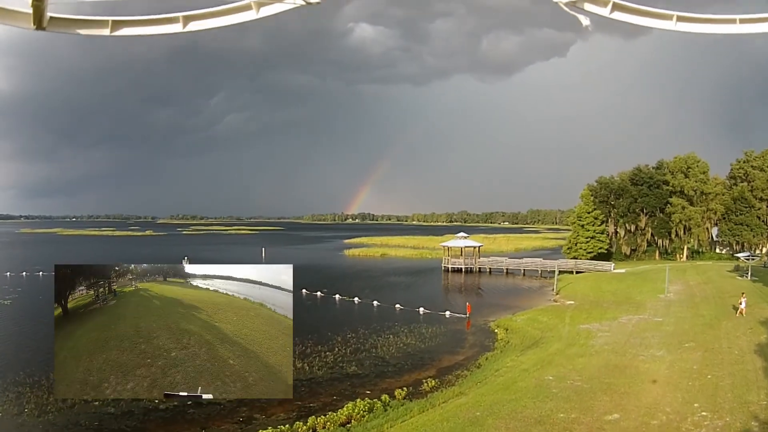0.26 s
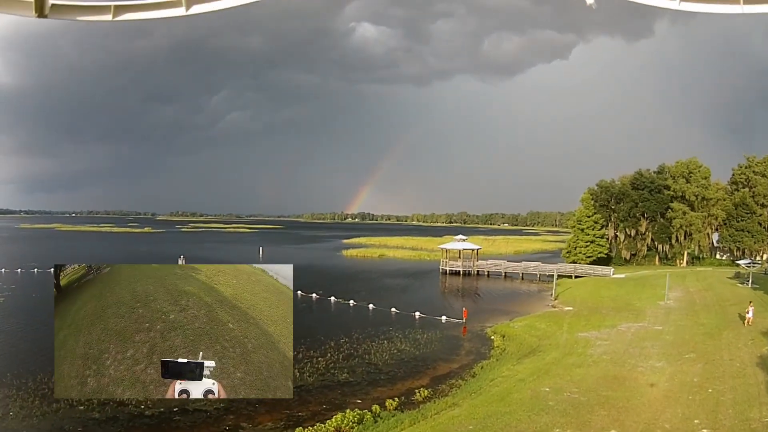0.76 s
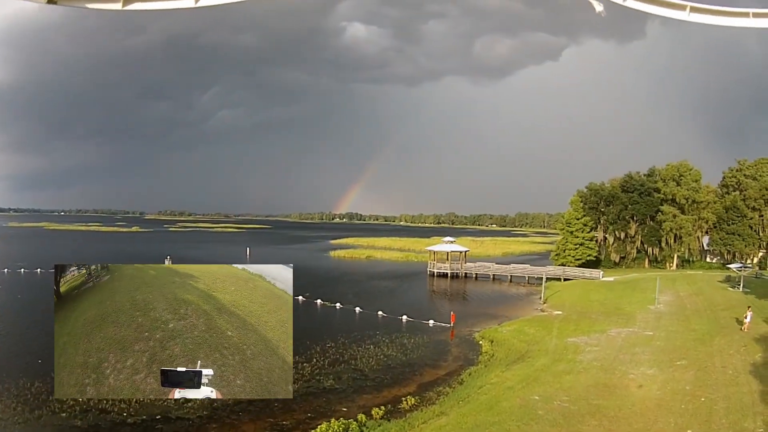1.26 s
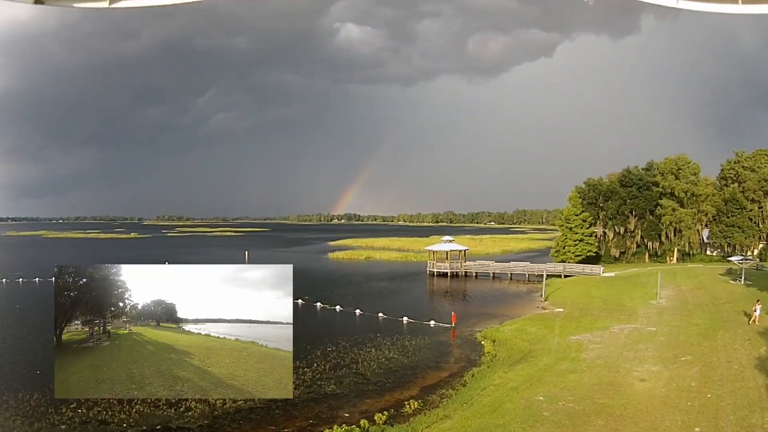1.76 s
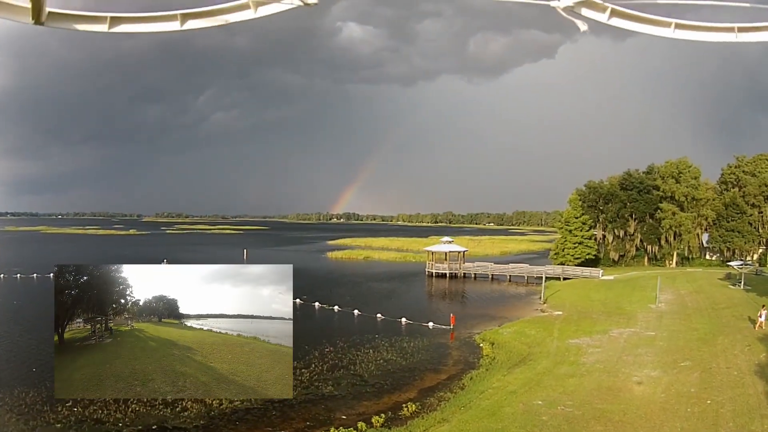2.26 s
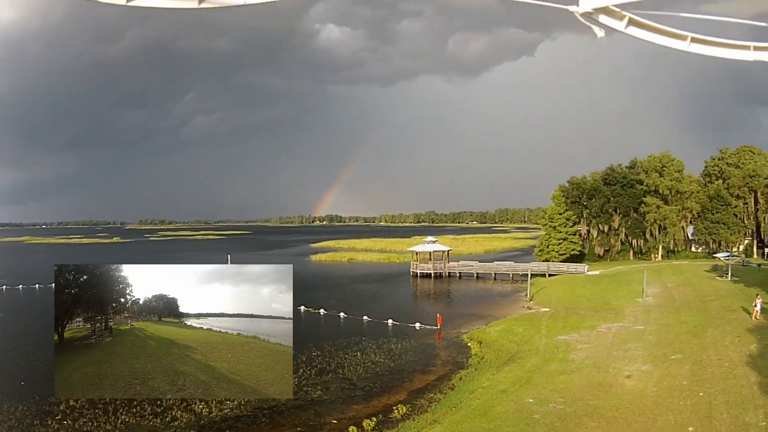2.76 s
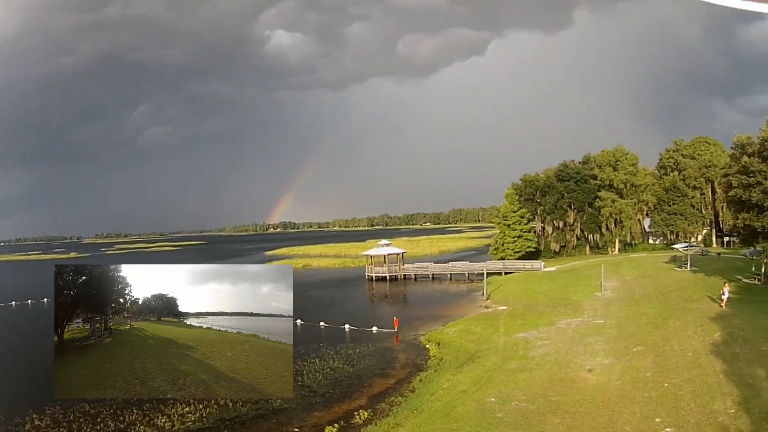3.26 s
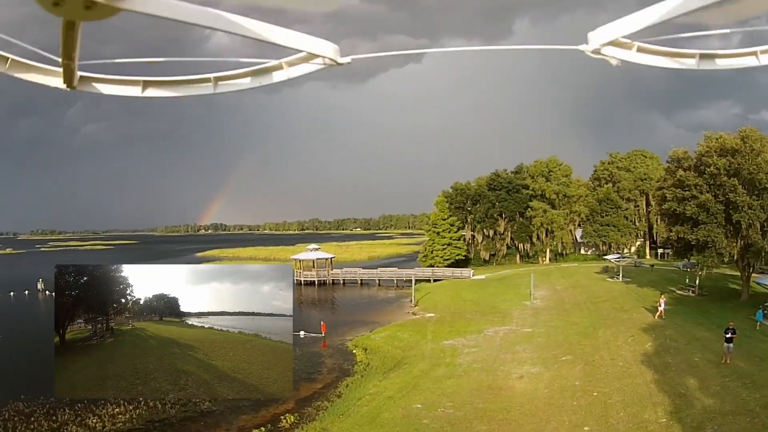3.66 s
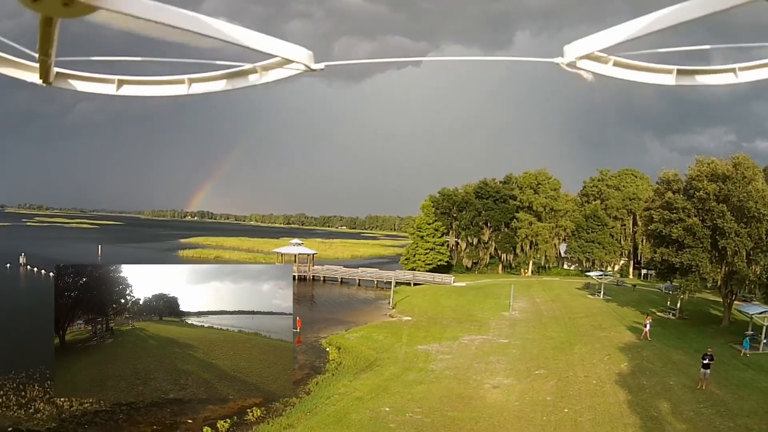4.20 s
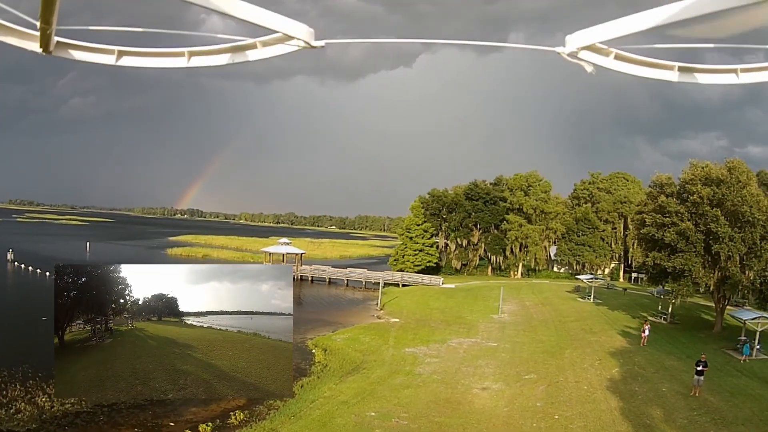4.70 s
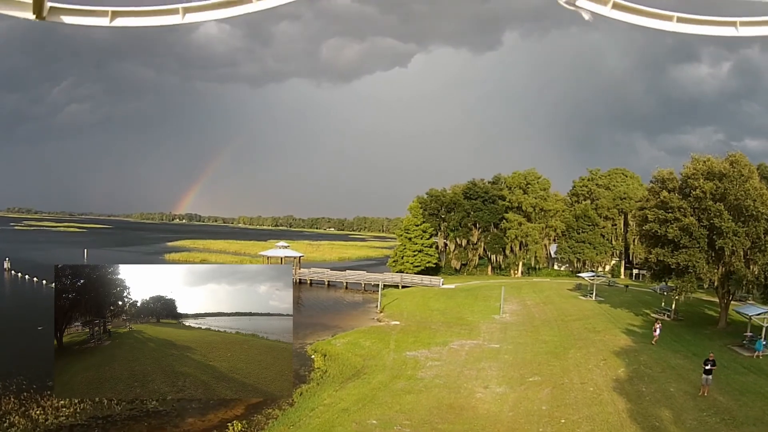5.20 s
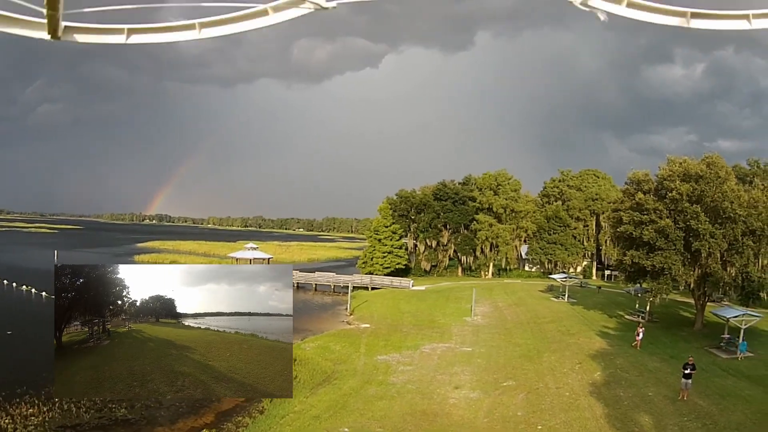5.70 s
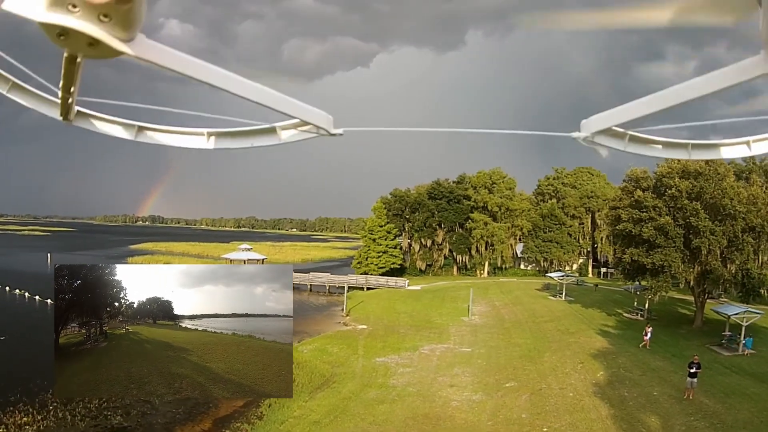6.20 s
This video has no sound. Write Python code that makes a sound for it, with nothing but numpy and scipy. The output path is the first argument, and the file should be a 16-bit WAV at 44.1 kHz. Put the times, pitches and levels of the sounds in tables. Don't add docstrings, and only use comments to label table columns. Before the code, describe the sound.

Close drone propellers drone and hiss with wavering pitch, a frame buzz comes and goes, and wind swells into heavy rumbling.

```python
import sys
import numpy as np
from scipy import signal
from scipy.io import wavfile
from scipy.ndimage import uniform_filter1d, map_coordinates

SR = 44100
rng = np.random.default_rng(int(sys.argv[2]) if len(sys.argv) > 2 else 0)


def gain_from_db(level_db):
    decades = np.asarray(level_db, float) / 20
    return 10 ** decades


def transcribe(u):
    v = np.clip(np.atleast_2d(u).T, -1, 1)
    q = np.round(v * 32767).astype(np.int16)
    wavfile.write(sys.argv[1], SR, q)


N = 284429


def evened(x):
    return x / np.sqrt(np.mean(x ** 2) + 1e-20)


def curves(rows, t):
    s, *columns = np.transpose(rows)
    return [np.interp(t, s, c) for c in columns]


def response(rows, hz):
    return np.interp(hz, *np.transpose(rows))


def bells(t, rows):
    return sum(height * np.exp(-((t - s) / half_s) ** 2) for s, height, half_s in rows)


def drift(rate_hz):
    steps = rng.standard_normal(400)
    return evened(map_coordinates(steps, [np.arange(N) / SR * rate_hz], order=2, mode="wrap"))


def cycles(hz):
    return np.cumsum(hz) / SR


def tone(turns, db, flutter_db):
    level = np.sqrt(2) * gain_from_db(db + flutter_db * drift(16.5))
    return level * np.cos(2 * np.pi * (turns + rng.random()))


def noise(colour, patchy_db, flicker_db, tilt_db=0, size=1024):
    hop = size // 4
    frames, hz = N // hop + 5, np.fft.rfftfreq(size, 1 / SR)
    a, b, patches = rng.standard_normal((frames, len(hz), 3)).T
    patches = uniform_filter1d(patches, size=9, axis=0)
    patches = evened(uniform_filter1d(patches, size=9, axis=1))
    flicker = evened(uniform_filter1d(rng.standard_normal(frames), size=5))
    f, db = np.transpose(colour)
    colour_db = np.interp(np.log(hz + 1), np.log(f), db, left=-80)[:, None]
    z = (a + 1j * b) * gain_from_db(colour_db + patchy_db * patches + flicker_db * flicker)
    scale = np.sqrt(np.sum(abs(z) ** 2) / frames)
    tilt = np.interp(np.arange(frames) * hop, np.arange(N), tilt_db * np.ones(N))
    treble = np.clip(np.log2((hz + 1) / 2000), 0, 1)
    z = z * gain_from_db(np.outer(treble, tilt))
    return signal.istft(z, nperseg=size, noverlap=size - hop)[1][:N] / scale


# start_s, blade_rate_hz, effort_db, lean (0-1)
NEAR_FLIGHT = [(0, 218.2, 2, 0), (.38, 218.9, -0.5, 0), (.74, 228.3, 2.5, 0.06), (1.0, 220, 1.5, 0.2),
               (1.5, 221.9, 0.5, 0.34), (1.87, 232, 2.5, 0.99), (2.05, 221.9, 1.5, 0.61),
               (2.26, 229.5, 1.5, .9), (2.6, 215.2, 0.5, 0.62), (3.05, 213.2, -0.5, 0.64),
               (3.34, 220.4, 0, 0.8), (3.9, 224.4, 1, .8), (4.54, 228.2, 1.5, 0.9), (4.95, 239.3, 1, 0.91),
               (5.3, 254.5, 1, 0.63), (5.68, 240.9, 5, 0.77), (5.95, 219.9, -1, .8), (6.45, 216, -4, 1)]
# centre_s, change_hz, half_length_s
SPEED_SURGES = [
    (2.822, 8, 0.095),
    (3.5, 18, 0.097),
    (3.73, 23, 0.096),
    (5.141, 19, .07),
    (6.277, -8, 0.084),
    (0.196, 2, 0.12),
    (1.284, 2, 0.085),
]


def near(t):
    hz, effort_db, lean = curves(NEAR_FLIGHT, t)
    return hz + bells(t, SPEED_SURGES), effort_db, lean


# order, level_db, full_lean_gain_db
STRONG_ORDERS = [(2, -62.5, -11), (3, -59.5, -4.5), (4, -66, 5), (5, -63, -4)]
# order, level_db
WEAK_ORDERS = [(.5, -72.5), (6, -74.5), (7, -75.5), (8, -76.5), (9, -78.5), (10, -84)]
# start_s, order_1_db, order_1.5_db
SHAFT_UNBALANCE = [(0, -64, -67.5), (.5, -68, -77), (.65, -61.5, -69), (1.0, -61, -74), (1.6, -63.5, -68.5),
                   (2.202, -62, -72), (2.9, -62, -71.5), (6.45, -64.5, -87.5)]
# pitch_hz, level_db
AIRFRAME_RESPONSE = [(460, -3.5), (510, 14), (640, 0), (720, 0), (790, 5.5), (900, 0.5), (970, 6),
                     (1060, 1), (1200, -3.5), (1320, -7.5)]
# pitch_hz, level_db
HOUSING_RESPONSE = [(1200, -3), (1400, -10), (1650, 0), (1850, -2.5), (2050, -9.5), (2400, -12)]


def near_rotor(t):
    hz, effort_db, lean = near(t)
    turns = cycles(hz * (1 + .002 * drift(40.)))
    out = np.zeros(N)
    for order, db, leaned_db in STRONG_ORDERS:
        level_db = db + lean * leaned_db + effort_db + response(AIRFRAME_RESPONSE, order * hz)
        out += tone(order * turns, level_db + 1.68 * drift(35.), 0.57)
    for order, db in WEAK_ORDERS:
        level_db = db + 0.35 * effort_db + 2.9 * lean + response(HOUSING_RESPONSE, order * hz) + 1.0
        out += tone(order * turns, level_db, 1.5)
    for order, level_db in zip((1, 3 / 2), curves(SHAFT_UNBALANCE, t)):
        out += tone(order * turns, level_db, 2.1)
    return out


# start_s, blade_rate_hz, level_db (added to every order)
FAR_FLIGHT = [(0, 232.6, -65), (.2, 232, -69.5), (.65, 229, -63.5), (.9, 221, -82), (1.2, 215, -69),
              (1.65, 214, -70),        (2.2, 217.5, -96), (3.13, 229, -67.5), (3.37, 255, -64),
              (3.5, 238, -60.5), (3.7, 227, -72), (4.4, 240, -86), (4.92, 228, -72), (5.1, 241.8, -65),
              (5.28, 248, -62.5), (5.57, 242, -75), (5.85, 228.5, -66.5), (6.45, 217, -71)]
# order, level_db
FAR_BLADE_ORDERS = [(2, -9.5), (3, -1.5), (4, -3.5), (5, 1), (6, 3), (7, -3), (8, -1.5), (9, -18.5)]


def far_rotor(t):
    hz, flight_db = curves(FAR_FLIGHT, t)
    turns = cycles(hz * (1 + 0.00305 * drift(40.)))
    out = np.zeros(N)
    for order, db in FAR_BLADE_ORDERS:
        body_db = response(HOUSING_RESPONSE, order * hz) + response(AIRFRAME_RESPONSE, order * hz)
        out += tone(order * turns, db + flight_db + body_db, 2.5)
    return out


# pitch_hz, level_db (per Hz)
WASH_COLOUR = [(150, -16.5), (400, -4.5), (580, -4.5), (1000, 0), (1350, -15), (1750, -9), (2350, -21.5),
               (3150, -16.5), (4050, -22.5), (4700, -19), (5450, -19), (6700, -29.5), (10500, -34),
               (15500, -45)]
CRUISE_HZ = 222
WASH_DB, WASH_DB_PER_HZ = -57.5, 0.0784
TILT_DB, TILT_DB_PER_HZ = 1.0, -0.0119


def wash(t):
    hz = near(t)[0]
    fast = np.maximum(hz, curves(FAR_FLIGHT, t)[0]) - CRUISE_HZ
    chop = 1 + 0.2 * np.cos(2 * np.pi * cycles(hz))
    tilt_db = TILT_DB + TILT_DB_PER_HZ * fast
    hiss = noise(WASH_COLOUR, patchy_db=0.47, flicker_db=0.96, tilt_db=tilt_db)
    return gain_from_db(WASH_DB + WASH_DB_PER_HZ * fast) * chop * hiss


# start_s, length_s, first_hz, last_hz, peak_db
WHINE_CROSSINGS = [(.15, .31, 4750, 4720, -68), (2.27, .13, 4700, 4720, -76), (2.373, 0.1, 4700, 4770, -68),
                   (2.53, 0.12, 4690, 4840, -69), (2.66, 0.041, 4790, 4720, -72),
                   (2.72, 0.058, 4660, 4800, -67), (2.95, 0.057, 4530, 4480, -77),
                   (3.04, .04, 4460, 4520, -77), (3.06, 0.064, 4890, 4660, -76),
                   (3.317, 0.08, 4660, 4780, -70), (3.79, .1, 4650, 4790, -68.5)]
WHINE_SKEW, WHINE_SHARP = 1.1, 0.93
ARCH_HZ_PER_S = 170
HUM_HZ, HUM_DB, HUM_WANDER_HZ = 4770, -91.5, 40


def whine(t):
    out = tone(cycles(HUM_HZ + HUM_WANDER_HZ * drift(2.3)), HUM_DB, 3.3)
    for s, length_s, first_hz, last_hz, db in WHINE_CROSSINGS:
        on = (t >= s) & (t < s + length_s)
        u = (t[on] - s) / length_s
        swell = np.sin(np.pi * u ** WHINE_SKEW) ** WHINE_SHARP
        hz = first_hz + (last_hz - first_hz) * u + ARCH_HZ_PER_S * length_s * swell
        out[on] += np.sqrt(2) * gain_from_db(db) * swell * np.sin(2 * np.pi * cycles(hz))
    return out


# start_s, pitch_hz, level_db
STRUT_WHINE = [(0, 3320, -88), (.15, 3400, -82), (.2, 3590, -84), (.4, 3590, -80), (.48, 3570, -74.5),
               (.55, 3420, -73), (.7, 3444, -76), (.9, 3430, -77), (1.2, 3350, -81)]


def strut(t):
    out = np.zeros(N)
    on = t < STRUT_WHINE[-1][0]
    hz, db = curves(STRUT_WHINE, t[on])
    fade = signal.windows.tukey(on.sum(), .08)
    out[on] = np.sqrt(2) * gain_from_db(db) * np.sin(2 * np.pi * cycles(hz)) * fade
    return out


# start_s, strength_db, fine_turbulence_db (against the rumble)
GUSTS = [(0, -58, -11), (1.0, -56, -13.5), (1.55, -56.5, -11.5), (1.87, -43, -19.5), (2.3, -45.5, -16.5),
         (2.75, -50.5, -13.5), (3.11, -47.5, -13.5), (3.35, -42.5, -14.5), (3.65, -43, -11),
         (3.86, -34, -11), (4.0, -31.5, -12), (4.24, -33, -13), (4.58, -36, -9), (5.0, -41.5, -4.5),
         (5.3, -37.5, -10.5), (5.8, -40.5, -11), (6.1, -35.5, -18), (6.45, -46.5, -9)]
# centre_s, rumble_db, thud_db
WIND_BUFFETS = [(.66, 0, -5), (1.4, -4, 10), (1.5, -6.5, 1.5), (2.19, -1.5, -6), (2.28, -1, -1),
                (3.38, 0.5, -6), (3.5, 4, 0), (3.86, 4.5, 4.5), (3.97, -8, -2), (4.06, 2.5, 5),
                (4.11, -4.5, -4), (4.16, 2, -2), (4.781, 3.5, -7), (5.28, 0, 3.5), (5.69, 1, 16.5),
                (5.8, -0.5, -8), (5.87, 1.5, 7.5), (6.21, -2.5, -5), (6.319, 3.5, 12)]
# pitch_hz, level_db (per Hz)
THUD_COLOUR = [(12, -20), (22, -3), (45, -3.5), (65, -4), (90, -20), (200, -120)]
# pitch_hz, level_db (per Hz)
RUMBLE_COLOUR = [(45, -21.5), (70, -2), (97, 2), (140, -5), (200, -13.5), (270, -29), (440, -120)]
# pitch_hz, level_db (per Hz)
ROAR_COLOUR = [(120, -13), (200, 9.5), (300, 3.5), (420, -6.5), (600, -15), (900, -53.5), (2000, -120)]
BUFFET_S, THUD_DB, THUD_FOLLOW = .04, -51.5, .8


def wind(t):
    gust_db, fine_db = curves(GUSTS, t)
    rumble_db = gust_db + bells(t, [(s, db, BUFFET_S) for s, db, _ in WIND_BUFFETS])
    thud_db = THUD_DB + THUD_FOLLOW * (gust_db + 45.5)
    thud_db = thud_db + bells(t, [(s, db, BUFFET_S) for s, _, db in WIND_BUFFETS])
    thud = evened(noise(THUD_COLOUR, patchy_db=3.5, flicker_db=1.0, size=4096))
    rumble = evened(noise(RUMBLE_COLOUR, patchy_db=-0.88, flicker_db=0.2, size=2048))
    roar = evened(noise(ROAR_COLOUR, patchy_db=1.26, flicker_db=-0.03))
    return gain_from_db(thud_db) * thud + gain_from_db(rumble_db + 0.52) * rumble + gain_from_db(gust_db + fine_db + 2.0) * roar


def resonate(x, hz, width):
    turn = np.exp(2j * np.pi * hz * np.arange(len(x)) / SR)
    r = np.exp(-np.pi * width / SR)
    return 2 * (turn * signal.lfilter([1 - r], [1, -r], x / turn)).real


# start_s, length_s, level_db
BUZZ_SPELLS = [
    [(0.449, 1.05, -71), (.5, .45, -79)],
    [(1.6, .07, -86), (2.3, .08, -86), (2.53, .15, -83), (2.85, .25, -82.5), (3.3, .18, -83.5),
     (3.67, .05, -82.5), (4.85, .08, -80.5), (6.25, .08, -82)],
    [(4.98, .55, -73), (5.5, 0.64, -73)],
]
# pitch_hz, width_hz, level_db
BUZZ_RESONANCES = [
    [(2770, 510, 0), (3130, 790, 3), (3410, 600, -1), (7240, 500, -10), (7900, 650, -5.5),
     (9260, 1800, -11.5), (10900, 2000, -15)],
    [(9780, 1000, -0.5), (10300, 320, 0.5)],
    [(3110, 330, 3), (4520, 450, -2.5), (5300, 640, -1)],
]


def buzz(t):
    hiss, out = rng.standard_normal(N), np.zeros(N)
    for spells, bands in zip(BUZZ_SPELLS, BUZZ_RESONANCES):
        rung = evened(sum(gain_from_db(db) * resonate(resonate(hiss, hz, width), hz, width) for hz, width, db in bands))
        swell = np.zeros(N)
        for s, length_s, db in spells:
            swell += gain_from_db(db) * np.exp(-((t - s - length_s / 2) / (.55 * length_s)) ** 4)
        out += rung * swell * gain_from_db(0.6 * drift(8.9))
    return out


# start_s, peak_db, ring_hz, ring_width_hz
MOUNT_KNOCKS = [
    (.54, -47, 610, 120),
    (0.539, -44, 1010, 160),
    (4.6625, -38, 2500, 4000),
    (5.5787, -59, 3000, 3970),
]


def knocks():
    out = np.zeros(N)
    u = np.arange(2000) / SR
    for s, db, hz, width in MOUNT_KNOCKS:
        attack = 1 - np.exp(-30. * width * u)
        ring = np.exp(-np.pi * width * u) * np.cos(2 * np.pi * hz * u) * attack
        out[round(s * SR):][:2000] += gain_from_db(db) * ring
    return out


def scene():
    t = np.arange(N) / SR
    rotors = near_rotor(t) + far_rotor(t)
    return (rotors + wash(t) + whine(t) + strut(t) + wind(t) + buzz(t) + knocks())[None]


# pitch_hz, step_db
ROUNDING_STEP = [(300, -17), (1200, -8.5), (2000, -0.5), (6000, -2.5), (9000, -4), (15000, -6.5)]
# start_s, finer_db
FINER_MOMENTS = [(1.87, 3), (2.0, 11), (2.12, 11), (2.4, 11), (2.64, 9), (2.75, 6), (2.92, 16), (3.09, 12),
                 (3.21, 9), (3.51, 8), (3.62, 17), (3.76, 1), (3.785, 7), (3.88, -1.5), (3.92, 2),
                 (4.02, 7), (4.055, -9), (4.105, 5), (4.135, -9.5), (4.16, -9), (4.21, 1), (4.25, 1.5),
                 (4.39, 7), (4.665, 4), (4.81, 14.5), (5.46, 8), (5.665, 14), (5.79, 12), (5.92, 14),
                 (6.25, 11), (6.42, 3)]


def camera_rounding(x, base_db, follow, frame_db, band_db, size=1024):
    n, k = np.arange(2 * size), np.arange(size)
    window = np.sin(np.pi * (n[:, None] + .5) / (2 * size)) * np.sqrt(2 / size)
    basis = window * np.cos(np.pi / size * np.outer(n + .5 + size / 2, k + .5))
    frames = N // size + 2
    blocks = np.pad(x, (size, frames * size - N)).reshape(-1, size)
    c = np.hstack([blocks[:-1], blocks[1:]]) @ basis
    loud_db = 10 * np.log10(np.mean(c ** 2, axis=1) + 1e-12)
    loud_db = .5 * (loud_db + uniform_filter1d(loud_db, size=9))
    spare_db = frame_db * rng.standard_normal(frames)
    at, finer_db = np.transpose(FINER_MOMENTS)
    spare_db[np.round(at * SR / size).astype(int)] += finer_db
    uneven_db = band_db * np.repeat(rng.standard_normal((frames, size // 16)), 16, axis=1)
    frame_step_db = base_db + follow * (loud_db + 45.5) - spare_db
    step = gain_from_db(response(ROUNDING_STEP, k * SR / (2 * size)) + uneven_db + frame_step_db[:, None])
    rounded = np.sign(c) * np.floor(abs(c) / step + 0.53) * step
    back = rounded @ basis.T
    return (back[:-1, size:] + back[1:, :size]).ravel()[:N]


def roll_off(x):
    return signal.sosfilt(signal.butter(12, 15560, fs=SR, output="sos"), x)


def record(dry):
    camera = camera_rounding(dry[0], base_db=-63, follow=0.93, frame_db=2.0, band_db=1.5)
    return roll_off(camera[None])


dry = scene()
out = record(dry)
transcribe(out)
```